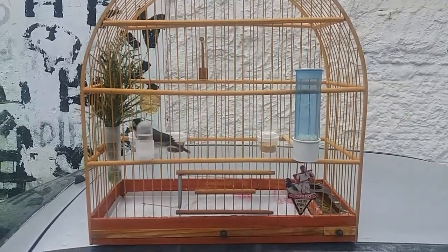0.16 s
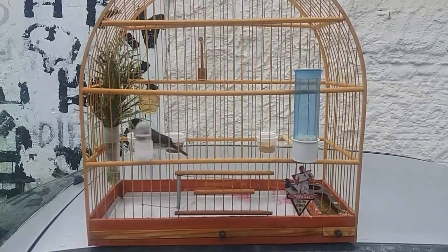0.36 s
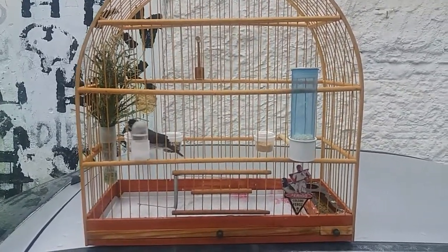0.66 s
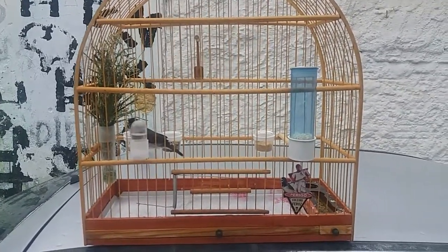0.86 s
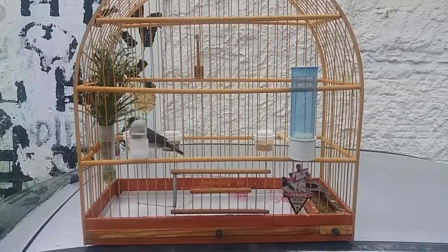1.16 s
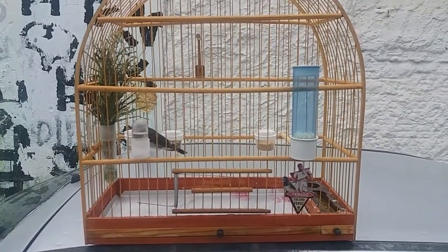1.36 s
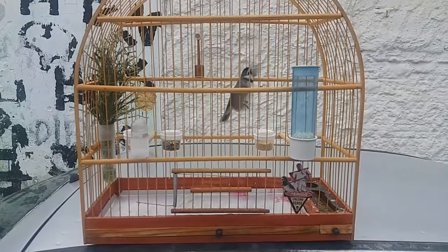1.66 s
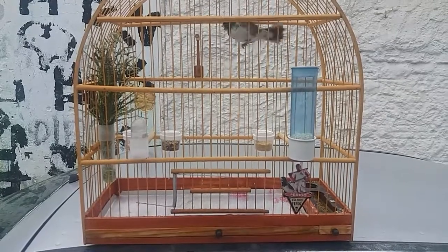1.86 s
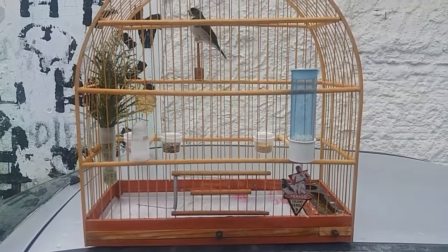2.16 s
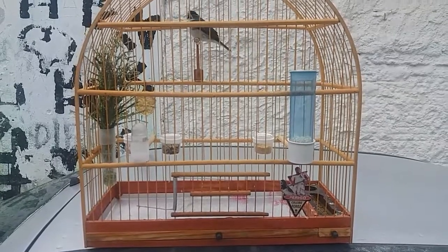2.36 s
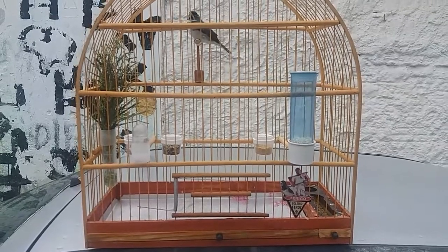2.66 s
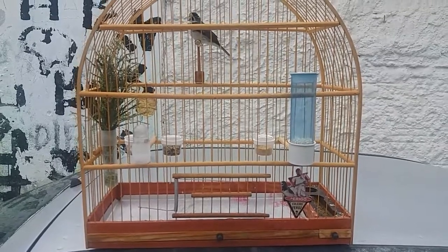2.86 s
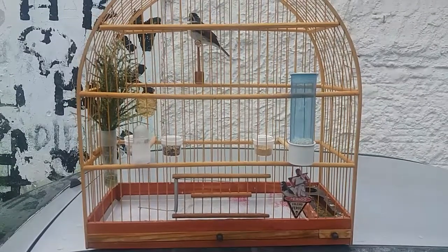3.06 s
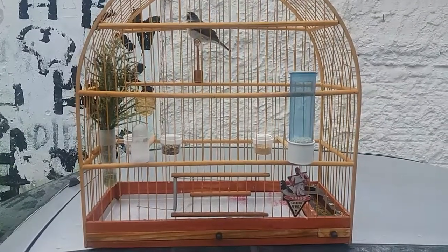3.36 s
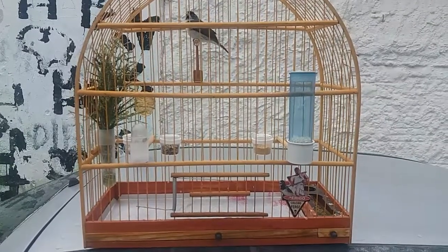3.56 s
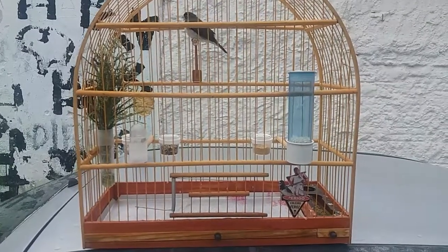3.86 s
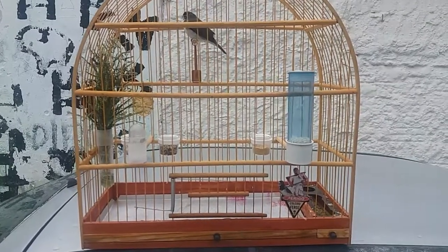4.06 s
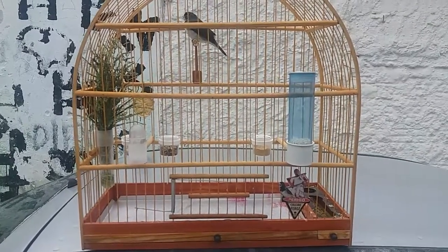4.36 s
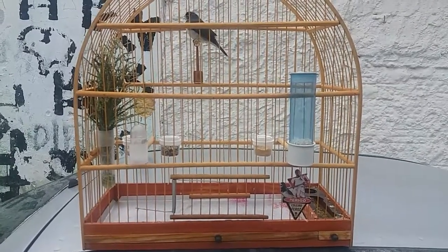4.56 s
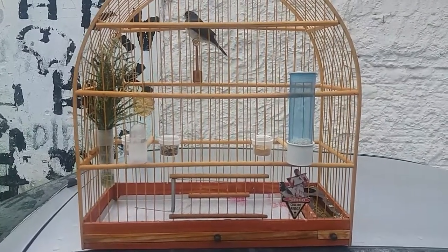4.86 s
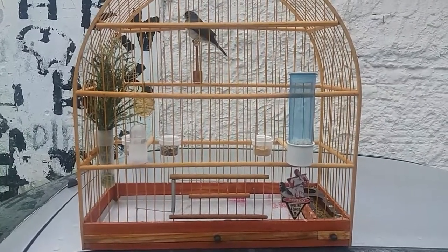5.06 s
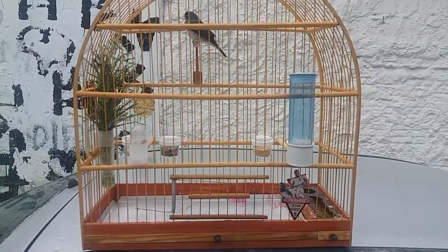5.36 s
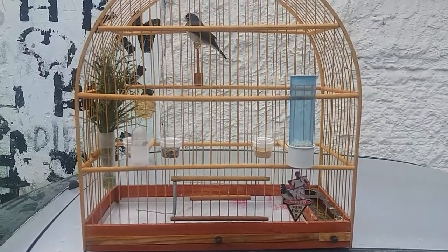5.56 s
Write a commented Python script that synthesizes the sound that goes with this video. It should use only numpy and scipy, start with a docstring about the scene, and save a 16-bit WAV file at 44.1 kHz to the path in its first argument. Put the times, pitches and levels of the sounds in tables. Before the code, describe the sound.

Within a second, a finch whistles, trills and repeats a sharp falling flourish; claws tick softly, then a long quiet pause with distant chirps.

```python
"""Finch in a walled yard

A small caged finch sings one quick phrase of whistles, trills and falling notes, pauses, and starts again.
Its voice is a gliding tone with overtones, throbbed for trills and blurred with narrow noise for hoarseness.
Wall echoes and a decaying tail return the notes; claws tick on a perch. The dying end of an earlier phrase
comes first. Far birds, built from short arched notes, faint narrow-band tones and a low town rumble of
shaped noise fill the pause."""
import sys
import numpy as np
from scipy import signal
from scipy.io import wavfile
from scipy.ndimage import uniform_filter1d

SR = 44100
rng = np.random.default_rng(int(sys.argv[2]) if len(sys.argv) > 2 else 0)


def store_wav(level_fs):
    """Save 16-bit WAV to argv[1]."""
    pcm = np.round(np.clip(np.atleast_2d(level_fs), -1, 1) * 32767)
    wavfile.write(sys.argv[1], SR, pcm.T.astype(np.int16))


N = 252252

# Spectrum of the town rumble. Each row: frequency in Hz, relative density in dB per Hz.
TOWN_SPECTRUM = [(26, -36), (45, -9.5), (70, 1.5), (146, -3), (297, -11.5), (409, -16), (600, -21.5),
                 (900, -24), (1830, -27.5), (2400, -33.5), (2980, -40), (4200, -42.5), (6530, -50.5),
                 (10000, -51), (13500, -47.5), (15800, -48.5)]
TOWN_DB = -47  # rms level ahead of the microphone
# Faint wavering tones and one brief band of hiss.
# Each row: start in seconds, end in seconds, pitch in Hz, width in Hz, level in dB before the fades.
FAINT_TONES = [ (0, 4.6, 3460, 10, -85), (3.5, 4.3, 335, 5, -62), (4.7, 4.95, 630, 10, -68),
               (4.35, 5.35, 335, 25, -64), (5.33, 5.65, 540, 20, -65), (4.9, 5.72, 2280, 400, -76)]
# Clear wall reflections. Each row: delay in seconds, level in dB.
WALL_ECHOES = [(.0015, -19.5), (.003, -16), (.006, -13.5), (.013, -22), (.035, -34), (.074, -34),
               (.27, -52), (.32, -55)]
# Reverberation of the yard. Each row: frequency in Hz, decay time t60 in seconds, relative level in dB.
YARD_DECAY = [(2509, 0.66, 4), (3320, .55, 4.5), (3870, 0.49, -1), (4800, 0.61, 0), (6200, .55, 7),
              (8000, .45, -1), (12000, 0.28, -3)]
# Notes of other birds, and first the dying end of the near singer's previous phrase; levels before the yard.
# Each row: start in seconds, length in seconds, start pitch in Hz, middle pitch in Hz, end pitch in Hz,
# peak level in dB, place of the peak 0-1, hoarseness 0-1.
FAINT_NOTES = [ (0, .105, 3100, 3150, 3120, -48, 0, .2), (1.4, .33, 4180, 4490, 4150, -71, .65, .1),
               (1.5, .12, 3000, 2980, 2950, -82, .4, .1), (2.78, .17, 4230, 4080, 3950, -79, .5, .1),
               (3.63, .18, 5350, 4050, 3350, -70, .45, .15), (5.045, .025, 4300, 4320, 4350, -63, .5, .2),
               (5.05, .03, 3700, 3700, 3700, -72, .5, .2), (5.08, .04, 4950, 5000, 5050, -65, .3, .25),
               (5.115, .065, 5700, 5400, 4750, -65, .4, .2), (5.11, .13, 3650, 4200, 4930, -57.5, .75, .35),
               (5.19, .1, 4110, 4500, 4830, -61, .2, .5), (5.12, .14, 2000, 2150, 2350, -71, .6, .4)]
FAINT_EDGE_DB, FAINT_OVER_DB = -9, -30  # level at the note ends re the peak, and of the overtones
# Flutter of the far chatter. Each row: first beat in seconds, end in seconds, beat rate in Hz,
# pitch fall in a beat in Hz (negative rises), lateness of the fall as a power, depth of the gap 0-1,
# beats to set in, share of the low end that lingers into the next beat.
FAR_TRILLS = [(5.13, 5.3, 62, -250, 1, .7, 1, 0)]
# Claws landing on a perch or wire. Each row: time in seconds, starting level in dB, ring in Hz.
CLAW_LANDINGS = [(1.728, -58, 4600), (1.766, -60, 4740), (1.94, -62.5, 5030), (2.01, -65, 6000)]
# Throbbing of the near syrinx; columns as for the far flutter.
NEAR_TRILLS = [(.2105, .284, 116, 800, .5, 1, 1.1, .06), (.465, .495, 185, 60, 1.7, .45, 1.2, .02),
               (.6633, .75, 119, 1150, 1.7, .75, .15, .35)]
# What throat and microphone let through of the overtones. Each row: frequency in Hz, gain in dB.
OVERTONE_FILTER = [(2000, -12.5), (3000, -13), (4000, 7.5), (4800, -10), (5800, -31), (7500, -35),
                   (9500, -43), (12000, -43.5), (14500, -30.5), (16000, -27), (18000, -90.5)]
# Strength of the overtones for each sung pitch: rich at low and at the highest pitches, poor between.
# Each row: pitch in Hz, gain in dB.
PITCH_RICHNESS = [(1200, 16), (1600, 8), (1950, 9), (2600, -12), (3600, -14), (4050, -22), (4300, -5),
                  (5200, -12), (6100, 6), (7500, 5)]
FUZZ_LIFT_HZ = 400  # lift of the hoarse fuzz above the pitch, shrinking to none at full hoarseness
# Short chips, scratchy wall slaps after notes, and faint difference tones between two sung pitches.
# Each row: start in seconds, length in seconds, start pitch in Hz, end pitch in Hz, peak level in dB,
# place of the peak 0-1, overtones in dB, hoarseness 0-1.
SHORT_SOUNDS = [ (.1, .012, 4000, 4000, -43, .5, -30, .8), (.347, .011, 3500, 3750, -42, .9, -30, .9),
                (.354, .028, 3500, 3750, -32, .15, -30, .5), (.519, .013, 4300, 4200, -20, .45, -16, .8),
                (.59, .025, 3950, 3950, -21, .75, -12, .8), (.61, .035, 5480, 5480, -48.5, .55, -30, .3),
                (.7, .04, 5950, 5950, -31, .55, 9, .4), (.712, .016, 1530, 1500, -48.5, .5, -30, .3),
                (.89, .014, 1400, 1410, -53.5, .5, -30, .25), (1.063, .016, 1450, 1450, -45, .5, -30, .2),
                (5.653, .042, 4300, 5200, -69, .2, -30, .8)]
SHORT_EDGE_DB = -14  # level at the ends re the peak
# The long notes, one curve a note. Each row: time in seconds, pitch in Hz, level in dB.
LONG_NOTES = [
    [(.165, 3120, -42), (.178, 3250, -31), (.19, 3452, -18), (.2, 3560, -10.5), (.215, 3640, -12),
     (.25, 3630, -14.5), (.28, 3540, -10.5), (.292, 3500, -13.5), (.2985, 3680, -14), (.302, 3720, -33)],
    [(.352, 1750, -55), (.366, 2250, -42), (.382, 2500, -32.5), (.4, 2745, -35), (.413, 2800, -39),
     (.42, 2897, -26), (.43, 2930, -22), (.445, 2970, -29), (.467, 3030, -40), (.485, 3030, -43)],
    [(.454, 3800, -30), (.465, 3800, -28), (.473, 3900, -15), (.488, 4010, -8), (.499, 4040, -7.5),
     (.502, 4050, -6), (.5145, 4080, -6.5), (.5185, 4000, -25)],
    [(.606, 3300, -31.5), (.62, 3305, -25.5), (.64, 3380, -15), (.653, 3540, -13.5), (.657, 3560, -20.5),
     (.664, 3640, -33)],
    [(.664, 4750, -12), (.715, 4850, -11), (.74, 4900, -13), (.75, 5050, -13.5), (.758, 5000, -17),
     (.762, 3500, -23)],
]
# Voice of each long note. Each row: extra overtones at start in dB, at end in dB, hoarseness at start 0-1,
# at end 0-1, hoarseness added per dB below its loudest.
LONG_VOICES = [(0, 2, .08, .11, .002), (-9, 3, .05, .02, .007), (0, -2, .01, .01, .015),
               (0, 4, .02, .02, .002), (-9, 10, .04, .2, 0)]
# Soft buzzy slides that open a phrase. Each row: start in seconds, length in seconds, ceiling pitch in Hz,
# full level in dB, extra overtones in dB, depth of the catch in Hz.
OPENING_SLIDES = [(.103, .075, 1700, -44.5, 3, 0), (5.66, .06, 1580, -57, -4, 120)]
OPENER_FROM_HZ, OPENER_CLIMB_S, CATCH_AT_S, CATCH_S = 1120, .035, .021, .006
OPENER_SOFT_DB, OPENER_SWELL_S, OPENER_HOARSE, OPENER_CLEAR_S = -15, .02, .3, .012
# High half of the closing syllable, a long fall.
# Each row: time from its start in seconds, pitch in Hz, relative level in dB.
CLOSING_HIGH_FALL = [(0, 7900, -21), (.004, 7450, -13.5), (.014, 7160, -11), (.025, 6830, 0),
                     (.038, 6280, -11), (.048, 6070, -7), (.058, 6040, -11)]
# Low half, a flick up. Each row: time from the flick in seconds, pitch in Hz, relative level in dB.
CLOSING_FLICK = [(0, 3800, -14), (.004, 4230, -7), (.011, 4450, -2), (.017, 4870, -8), (.024, 5300, -17)]
# Low half, a fall that drops away. Each row: time from the flick in seconds, pitch in Hz, relative level in dB.
CLOSING_LOW_FALL = [(.019, 3850, -7), (.029, 3760, 0), (.035, 3650, -3.5), (.041, 3510, -8),
                    (.051, 3185, -19), (.062, 2820, -30), (.066, 1890, -36)]
# The closing syllable is sung twice.
# Each row: high half start in seconds, its level in dB, low half start in seconds, its level in dB.
CLOSING_SYLLABLES = [(.822, -19, .875, -7.5), (.991, -17, 1.047, -7.5)]
# Voices of the high fall, flick and low fall; columns as for the long notes.
CLOSING_VOICES = [(0, 0, .03, .05, .002), (0, -6, .07, .12, .003), (4, 0, .03, .03, .005)]


def amp(db):
    """Decibel law: amplitude gain from a level in dB."""
    return 10 ** (np.asarray(db) / 20)


def evened(x):
    """Power normalization: scales a signal to rms 1."""
    return x / np.sqrt(np.mean(abs(x) ** 2) + 1e-20)


def read(points, hz):
    """Logarithmic frequency scale: interpolates a spectrum along it."""
    f, value = np.transpose(points)
    return np.interp(np.log(hz + 1), np.log(f + 1), value)


def add(mix, s, sound):
    """Superposition: sums a sound into the mix at a time in seconds."""
    part = mix[max(round(s * SR), 0):][:len(sound)]
    part += sound[:len(part)]


def rotation(hz):
    """Phase as the integral of frequency: a unit phasor turning at a varying pitch."""
    return np.exp(2j * np.pi * np.cumsum(hz) / SR)


def flutter(count, width_hz):
    """Narrow-band noise: a complex envelope with random swells and phase slips."""
    settle = 2000  # samples dropped while the filter starts
    z = rng.standard_normal(count + settle) + 1j * rng.standard_normal(count + settle)
    lowpass = signal.butter(N=4, Wn=width_hz / SR, output="sos")
    return evened(signal.sosfilt(lowpass, z)[settle:])


def noise_band(t, hz, width_hz):
    """Heterodyning: shifts narrow-band noise up to a centre frequency."""
    return flutter(count=len(t), width_hz=width_hz) * np.exp(2j * np.pi * hz * t)


def town():
    """Spectral shaping of noise: far traffic and air, with drifting patches and a slow swell."""
    frames, hz = N // 512 + 5, np.fft.rfftfreq(2048, 1 / SR)
    real, imaginary, patches = rng.standard_normal((frames, 1025, 3)).T
    patches = uniform_filter1d(patches, size=24, axis=0)  # across frequency
    patches = evened(uniform_filter1d(patches, size=10, axis=1))  # across time
    t = np.arange(frames) * 512 / SR
    swell = 0
    for f in np.geomspace(.2, 6, 20):
        swell = swell + np.sin(2 * np.pi * (f * t + rng.random())) / np.sqrt(f)
    level_db = read(TOWN_SPECTRUM, hz)[:, None] + 1.0 * patches + .4 * evened(swell)
    z = (real + 1j * imaginary) * amp(level_db)
    rumble = signal.istft(z, nperseg=2048, noverlap=1536)[1][:N]
    return amp(TOWN_DB) * evened(rumble)


def tones():
    """Bandwidth and wavering: noise bands a few Hz wide are heard as unsteady tones, wide ones as hiss."""
    out = np.zeros(N)
    for start, end, hz, width_hz, db in FAINT_TONES:
        t = np.arange(start, end, 1 / SR)
        wave = evened(noise_band(t, hz, width_hz).real)
        add(out, start, amp(db) * wave * signal.windows.tukey(len(t), .3))
    return out


def walls(x, direct_db, tail_db):
    """Reverberation by convolution: clear echoes, and sparse taps of random sign that die band by band."""
    taps = np.zeros(SR)
    at = np.arange(200, SR - 20, 20)
    taps[at + rng.integers(0, 20, len(at))] = rng.choice([-1., 1.], len(at))
    hz, t, z = signal.stft(taps, SR, nperseg=256)
    yard = np.array(YARD_DECAY)
    t60 = read(yard[:, [0, 1]], hz)[:, None]
    colour_db = read(yard[:, [0, 2]], hz)[:, None]
    tail = signal.istft(z * amp(colour_db - 60 * t / t60), SR, nperseg=256)[1][:SR]
    response = amp(tail_db) * tail / np.linalg.norm(tail)
    for s, db in WALL_ECHOES:
        add(response, s, amp([db]))
    return amp(direct_db) * x + signal.fftconvolve(x, response)[:N]


def throb(t, trills):
    """Periodic modulation of pitch and amplitude: each beat glides, gaps, and its low end lingers."""
    bend, gain, low_hz, linger = np.zeros(len(t)), np.ones(len(t)), np.zeros(len(t)), np.zeros(len(t))
    for start, end, beat_hz, fall_hz, late, gap, onset, share in trills:
        beats = (t - start) * beat_hz
        within = beats % 1
        on = np.clip(np.minimum(beats / onset, (end - t) * beat_hz), 0, 1)
        bend += on * fall_hz * uniform_filter1d(1 / (1 + late) - within ** late, size=30)
        gain *= 1 - on * gap * abs(np.cos(np.pi * within ** 1.1)) ** 2.8
        low_hz -= on * fall_hz * 0.89 * late / (1 + late)
        after_first = np.clip(4 * (beats - 1) + .5, 0, 1)
        linger += on * after_first * share * uniform_filter1d(np.exp(-within / .3), size=30)
    return bend, gain, low_hz, linger


def note(rows, trills):
    """Harmonic synthesis: a whistle with overtones, whose hoarseness trades steady swing for noise."""
    s, *columns = np.transpose(rows)
    t = np.arange(s[0], s[-1], 1 / SR)
    hz, level_db, over_db, hoarse = (np.interp(t, s, c) for c in columns)
    bend, gain, low_hz, linger = throb(t, trills)
    lingering = linger * rotation(hz + low_hz)
    hoarse = np.clip(hoarse, 0, 1)
    lift = rotation(FUZZ_LIFT_HZ * (1 - hoarse))
    swing = np.sqrt(1 - hoarse ** 2) + hoarse * lift * flutter(count=len(t), width_hz=1170)
    shake = 1 + .1 * hoarse * flutter(count=len(t), width_hz=500).real
    hz = (hz + bend) * shake
    turn = rotation(hz)
    # overtones above 6 kHz come and go; all thin out with their order
    patchy = .5 + .55 * flutter(count=len(t), width_hz=600)
    tone = turn.copy()
    for k in range(2, 7):
        over = amp(over_db - 2.5 * (k - 3) + read(OVERTONE_FILTER, k * hz)) * turn ** k
        tone += over * np.where(k * hz > 6000, patchy, 1)
    # air hisses through the beak, more on hoarse high notes
    hiss = noise_band(t, 13500, width_hz=5000)
    tone += amp(-33) * np.minimum(hoarse + .04, .25) * (hz / 5000) ** 2.5 * hiss
    edges = np.clip(np.minimum(t - s[0], s[-1] - t) / 0.002032, 0, 1)
    voice = (swing * (gain * tone + lingering)).real
    return s[0], np.sqrt(2) * amp(level_db) * edges * voice


def birds(notes, trills=()):
    """Superposition of sources: lays the notes out in time."""
    out = np.zeros(N)
    for rows in notes:
        add(out, *note(rows, trills))
    return out


def arch(start, length, pitches, peak_db, peak_at, edge_db, over_db, hoarse):
    """Polynomial glide and single-peaked envelope: pitch bends through the values as level rises and falls."""
    u = np.linspace(0, 1, num=21)
    places = np.linspace(0, 1, len(pitches))
    hz = np.polyval(np.polyfit(places, pitches, len(pitches) - 1), u)
    peak_at = np.clip(peak_at, .001, .999)
    away = np.where(u < peak_at, 1 - u / peak_at, (u - peak_at) / (1 - peak_at))
    return np.transpose([start + length * u, hz, peak_db + edge_db * away, over_db + 0 * u, hoarse + 0 * u])


def faint_calls():
    """Frequency glides at low level: the dying end of the singer's previous phrase, then other birds."""
    notes = []
    for s, length, first, middle, last, db, at, hoarse in FAINT_NOTES:
        notes.append(arch(s, length, [first, middle, last], db, at, FAINT_EDGE_DB, FAINT_OVER_DB, hoarse))
    return notes


def hops():
    """Impact and damped ring: each claw landing is a short scratchy tick of decaying band noise."""
    out, t = np.zeros(N), np.arange(600) / SR
    for s, db, hz in CLAW_LANDINGS:
        scratch = noise_band(t, hz, width_hz=2200).real
        attack = np.clip(t / .001, 0, 1)
        add(out, s, amp(db - 60 * t / .025) * attack * scratch)
    return out


def short_sounds():
    """Brief arched tones: chips, scratchy wall slaps and difference tones, none throbbing with the trills."""
    notes = []
    for s, length, first, last, db, at, over_db, hoarse in SHORT_SOUNDS:
        notes.append(arch(s, length, [first, last], db, at, SHORT_EDGE_DB, over_db, hoarse))
    return notes


def voiced(curve, voice, start=0, full_db=0):
    """Timbre tied to pitch and level: overtones follow the pitch, and hoarseness the drop in level."""
    s, hz, level_db = np.transpose(curve)
    ends = s[[0, -1]]
    over_db = read(PITCH_RICHNESS, hz) + np.interp(s, ends, voice[:2])
    hoarse = np.interp(s, ends, voice[2:4]) + voice[-1] * (level_db.max() - level_db)
    return np.transpose([start + s, hz, full_db + level_db, over_db, hoarse])


def opener(start, length, top_hz, full_db, extra_db, catch_hz):
    """Exponential relaxation: pitch, level and clarity settle; the climb may catch once on the way."""
    t = np.linspace(0, length, num=24)
    hz = top_hz - (top_hz - OPENER_FROM_HZ) * np.exp(-t / OPENER_CLIMB_S)
    hz -= catch_hz * np.exp(-((t - CATCH_AT_S) / CATCH_S) ** 2)
    level_db = full_db + OPENER_SOFT_DB * np.exp(-t / OPENER_SWELL_S)
    over_db = extra_db + read(PITCH_RICHNESS, hz)
    hoarse = .03 + OPENER_HOARSE * np.exp(-t / OPENER_CLEAR_S)
    return np.transpose([start + t, hz, level_db, over_db, hoarse])


def song():
    """Frequency and level contours: the long notes, slides and closing syllables of the near singer."""
    notes = [voiced(curve, voice) for curve, voice in zip(LONG_NOTES, LONG_VOICES)]
    notes += [opener(*row) for row in OPENING_SLIDES]
    high_voice, flick_voice, low_voice = CLOSING_VOICES
    for high_s, high_db, low_s, low_db in CLOSING_SYLLABLES:
        notes.append(voiced(CLOSING_HIGH_FALL, high_voice, high_s, high_db))
        notes.append(voiced(CLOSING_FLICK, flick_voice, low_s, low_db))
        notes.append(voiced(CLOSING_LOW_FALL, low_voice, low_s, low_db))
    return notes


def scene():
    """Direct and reverberant sound: the faint calls have the stronger tail, the near singer the weaker."""
    singer = birds(song(), NEAR_TRILLS) + birds(short_sounds())
    near = walls(singer + hops(), direct_db=0, tail_db=-22.5)
    faint = walls(birds(faint_calls(), FAR_TRILLS), direct_db=-3, tail_db=-3)
    return (near + faint + tones() + town())[None]


def record(dry):
    """Band limiting: the microphone drops the deep bass, the recorder the top above 16 kHz."""
    bass_cut = signal.butter(N=6, Wn=50, btype="high", fs=SR, output="sos")
    thinned = signal.sosfilt(bass_cut, dry)
    top_cut = signal.firwin(511, 16000, window=("kaiser", 9), fs=SR)
    return signal.oaconvolve(thinned, top_cut[None], "same")


dry = scene()
out = record(dry)
store_wav(out)
```